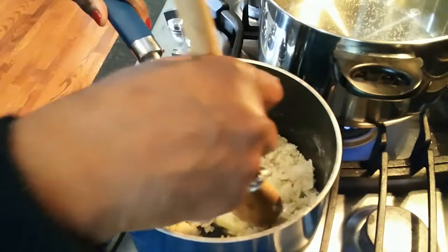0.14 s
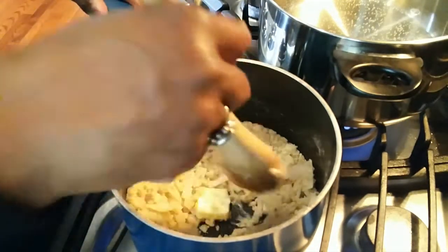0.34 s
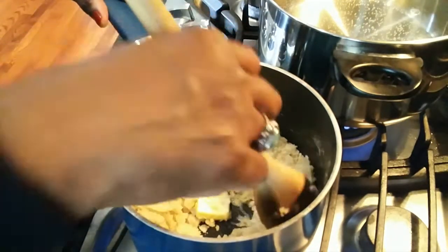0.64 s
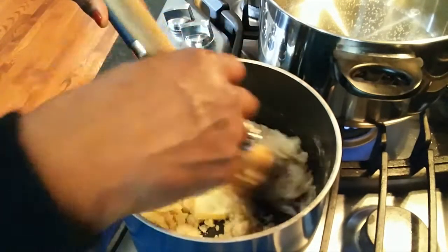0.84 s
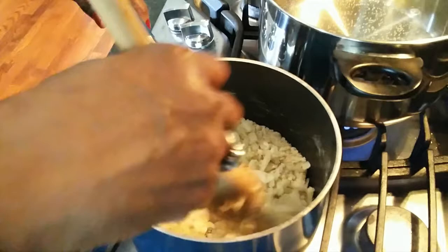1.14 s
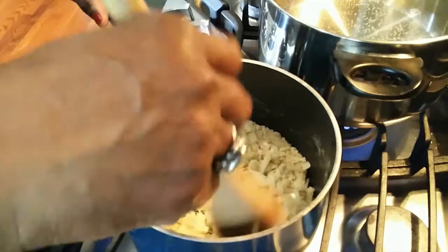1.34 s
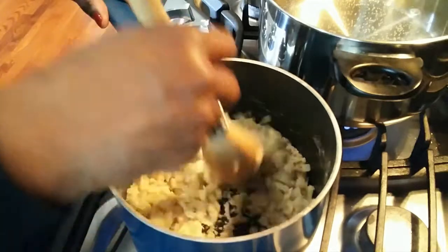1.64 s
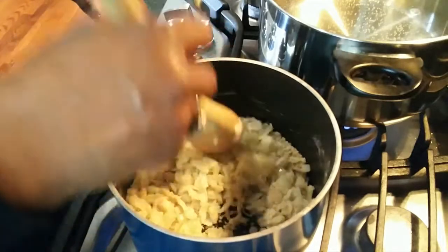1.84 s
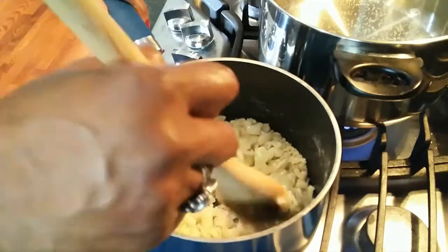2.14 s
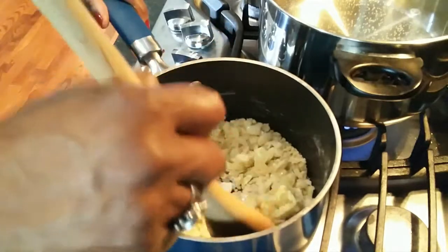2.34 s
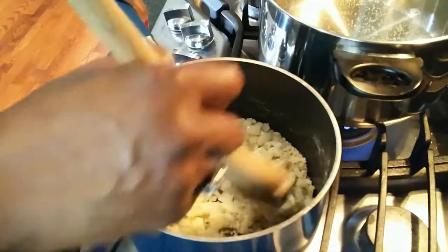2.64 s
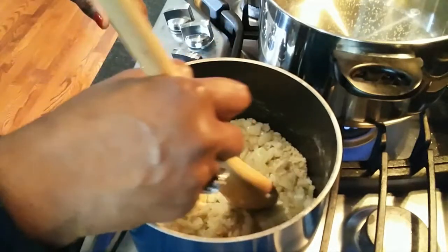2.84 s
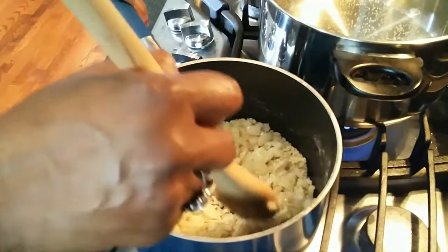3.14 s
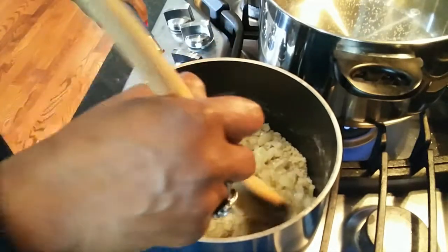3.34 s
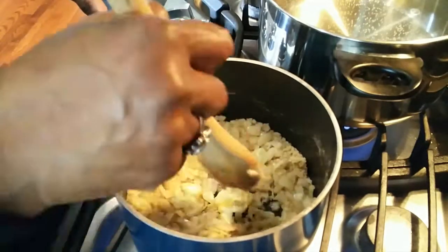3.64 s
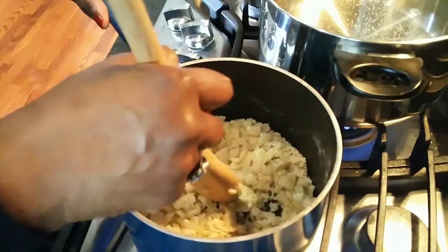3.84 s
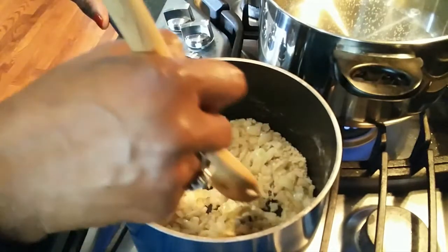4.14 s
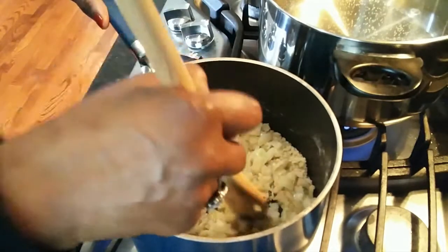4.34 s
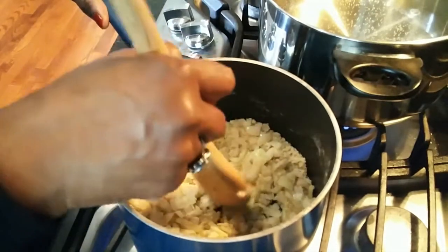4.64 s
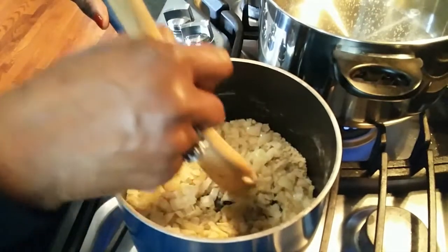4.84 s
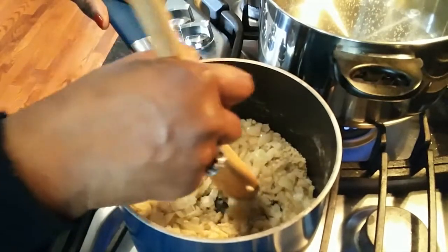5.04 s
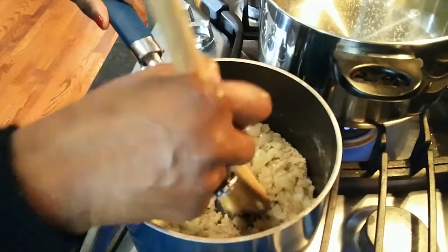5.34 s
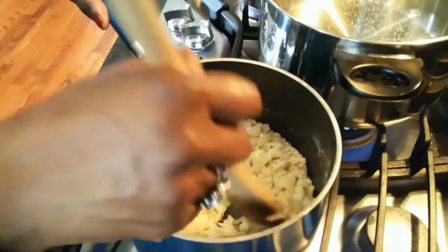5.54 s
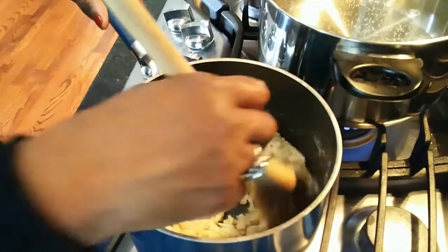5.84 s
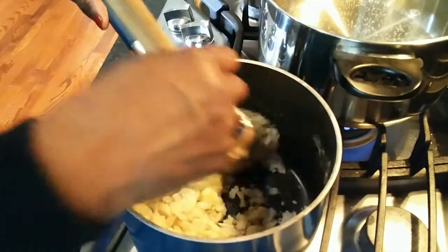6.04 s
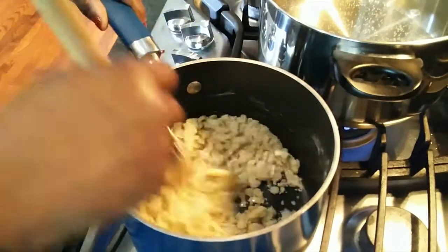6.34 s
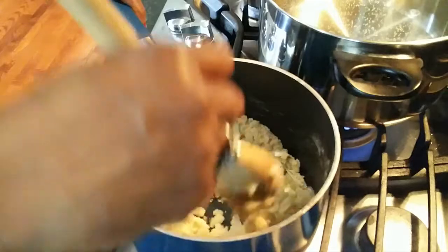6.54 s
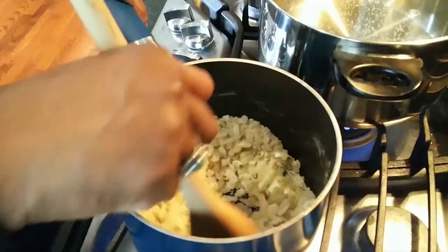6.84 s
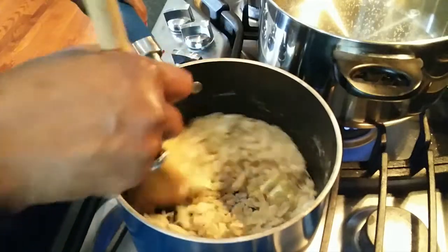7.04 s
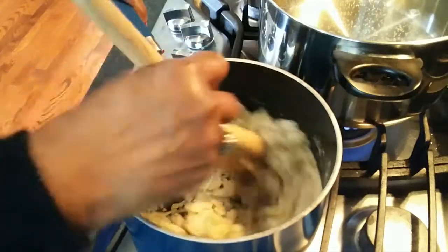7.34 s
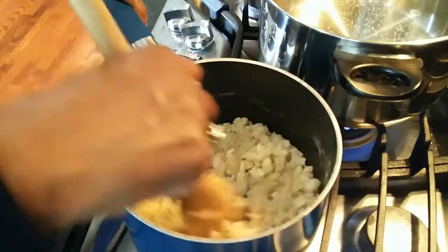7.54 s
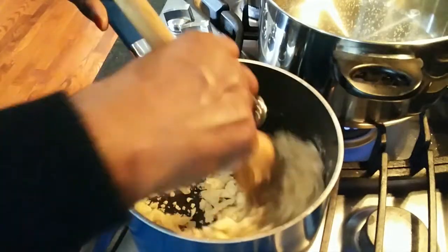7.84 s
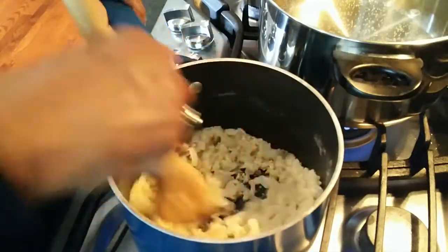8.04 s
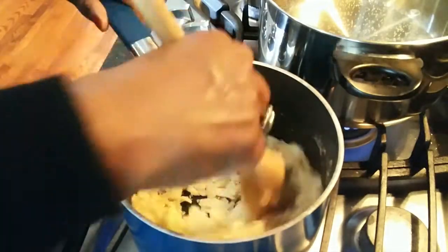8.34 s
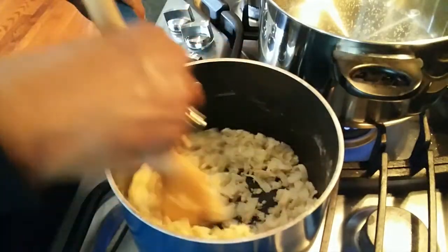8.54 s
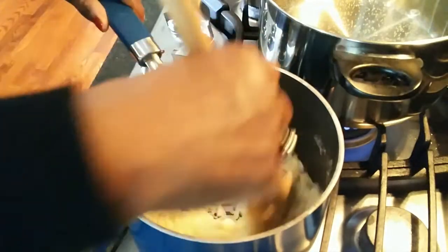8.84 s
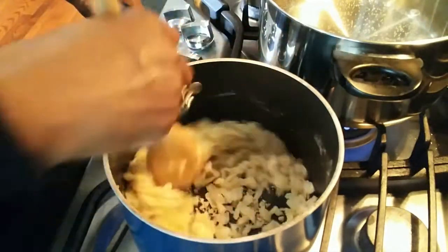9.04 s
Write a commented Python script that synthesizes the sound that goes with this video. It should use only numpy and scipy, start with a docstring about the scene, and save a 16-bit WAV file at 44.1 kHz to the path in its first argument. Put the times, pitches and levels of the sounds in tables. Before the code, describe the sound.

Close stereo pickup in a small kitchen. Fat fizzes finely over a soft, low gas flame roar while a wooden spoon lightly taps and scrapes a metal saucepan. The sizzle thins briefly, then separate hard, dull knocks ring the damped pan. The flame flutters, fat spits sharply, and frying grows louder under quick, dense scraping to the end.

```python
"""A saucepan of onion and flour frying on a gas stove in a small kitchen, heard close by two microphone ports.
Faint taps and wooden scrapes open over fizzing fat and burner roar; a thin tone sags at about 1 s.
The fizz thins from 2.2 to 3.3 s, then the spoon chops and knocks, hardest between 3.4 and 5.5 s.
Flame flutter swells at 6.5 s, fat spits thickly up to 7 s, then louder frying and dense scraping go on to the end.
Damped modes ring the pan, shaped noise makes fat and flame, and random echoes make the kitchen."""
import sys
import numpy as np
from scipy import signal
from scipy.fft import rfft, irfft
from scipy.io import wavfile
from scipy.ndimage import uniform_filter1d

SR = 44100
rng = np.random.default_rng(int(sys.argv[2]) if len(sys.argv) > 2 else 0)


def output_pcm(signal):
    """Save a mono or channel-first signal as 16-bit PCM at the path in sys.argv[1].

    Samples are clipped to [-1, 1] before scaling.
    """
    pcm = np.clip(np.atleast_2d(signal).T, -1, 1) * 32767
    wavfile.write(sys.argv[1], SR, np.round(pcm).astype(np.int16))


N = 404838


def gain_of(db):
    """dB to amplitude."""
    return 10 ** (np.asarray(db) / 20)


def evened(x):
    """Scales to rms 1."""
    return x / np.sqrt(np.mean(x ** 2) + 1e-20)


def read(hz, f, value):
    """Reads a spectrum on a log-frequency axis."""
    return np.interp(np.log(hz + 1), np.log(np.asarray(f) + 1), value)


def follow(rows):
    """Curve columns at every sample; the first, a level, is silent outside the table."""
    s, level_db, *rest = np.transpose(rows)
    t = np.arange(N) / SR
    level = np.interp(t, s, level_db, -200, -200)
    return [level] + [np.interp(t, s, column) for column in rest]


def grains(per_s, spread_db, length_ms):
    """Envelope of random short bursts, a few of them large."""
    size = gain_of(spread_db * np.minimum(rng.exponential(1, N), 5))
    starts = rng.random(N) < per_s / SR
    decay = np.exp(-1000 / (SR * length_ms))
    return evened(signal.lfilter([1], [1, -decay], size * starts))


def fuzzy(hz, width_hz, steady):
    """Noise narrowed to a wavering line that follows hz; steady (0-1) evens out its level."""
    r = np.exp(-np.pi * width_hz / SR)
    noise = rng.standard_normal(N) + 1j * rng.standard_normal(N)
    slow = signal.lfilter([1], [1, -2 * r, r * r], noise)
    slow = slow / (abs(slow) + 1e-9) ** np.clip(steady, 0, 1)
    phase = 2 * np.pi * np.cumsum(hz * np.ones(N)) / SR
    return evened((slow * np.exp(1j * phase)).real)


# burner and room spectrum before overall scaling: (frequency [Hz], level [dB per Hz])
ROAR = [(20, -45), (36, 0), (52, -2.5), (80, 2.5), (120, -7), (140, -3), (306, -21.5), (342, -8),
        (398, -19), (552, -12.5), (657, -6.5), (993, -22), (4000, -36), (5200, -93), (8800, -120)]
# likeness of the two microphone ports: (frequency [Hz], left-right correlation [-1 to 1])
LIKENESS = [(60, 0.91), (180, 0.82), (550, 0.24), (1650, -0.37), (4970, 0.79), (15000, -0.13)]
# flame flutter lines: (frequency [Hz], width [Hz], level [dB against the flame])
FLUTTER = [(63.5, 6.4, 1.5), (116.5, 8.2, -10.5)]
# flame strength, which drives the flutter: (time [s], level [dB])
FLAME = [(0, -57.5), (3.2, -60), (6.2, -57.5), (6.5, -47.5), (7.0, -55.5), (9.18, -56.5)]
ROAR_DB, PATCH_DB = -51.5, 3.35  # roar level over both ports; depth of its drifting patches


def burner():
    """Low roar of flame and room in drifting patches, with the flame's flutter on top."""
    frames, hz = N // 512 + 5, np.fft.rfftfreq(2048, 1 / SR)
    a, b, c, d, patches = rng.standard_normal((frames, 1025, 5)).T
    patches = uniform_filter1d(patches, size=8, axis=0)
    patches = evened(uniform_filter1d(patches, size=10, axis=1))
    same = np.clip(read(hz, *np.transpose(LIKENESS)), -1, 1)[:, None]
    left, other = a + 1j * b, c + 1j * d
    z = np.array([left, same * left + np.sqrt(1 - same ** 2) * other])
    drift_db = PATCH_DB * patches * np.clip(hz / 250, 0, 1)[:, None]  # the lowest bass drifts less
    z *= gain_of(read(hz, *np.transpose(ROAR))[:, None] + drift_db)
    roar = gain_of(ROAR_DB) * evened(signal.istft(z, nperseg=2048, noverlap=1536)[1][:, :N])
    lines = sum(gain_of(db) * fuzzy(f, width, 0.15) for f, width, db in FLUTTER)
    flutter = gain_of(follow(FLAME)[0]) * lines
    return (roar + flutter) * gain_of([[.7], [-.7]])  # the left port hears slightly more


# a faint thin tone: (time [s], frequency [Hz], level [dB])
TONE = [(.86, 736, -66), (.9, 728, -50.5), (1.05, 724, -56), (1.115, 697, -53), (1.135, 708, -79)]


def tone():
    """A faint thin line of narrowed noise that wavers as it sags."""
    s, hz, db = np.transpose(TONE)
    level_db = follow(np.transpose([s, db]))[0]
    return gain_of(level_db) * fuzzy(np.interp(np.arange(N) / SR, s, hz), 6.0, .85)


# how long the small kitchen answers: (frequency [Hz], time to fall 60 dB [s])
KITCHEN = [(200, 0.5), (530, 0.35), (1400, 0.27), (5000, 0.28)]


def kitchen(x):
    """Sparse random echoes, each band dying at its own speed; three sets take turns so no one colour dominates."""
    taps = np.zeros((3, 2, SR // 2))
    slots = np.arange(260, SR // 2 - 20, 20)  # the first echo comes after about 6 ms
    at = slots + rng.integers(0, 20, (3, 2, (SR // 2 - 261) // 20))
    np.put_along_axis(taps, at, rng.choice([-1., 1.], at.shape), 2)
    taps[:, 1] = .6 * taps[:, 0] + .8 * taps[:, 1]  # the ports share part of the echoes
    hz, t, z = signal.stft(taps, SR, nperseg=256)
    t60 = read(hz, *np.transpose(KITCHEN))[:, None]
    tail = signal.istft(z * gain_of(-60 * t / t60), SR, nperseg=256)[1]
    tail = tail * np.sqrt(3) / np.linalg.norm(tail[:, 0])
    offset = np.arange(3)[:, None, None] / 3
    turn = np.sqrt(2 / 3) * np.cos(np.pi * (np.arange(N) / SR * 1.3 + offset))
    return signal.fftconvolve(x * turn, tail, axes=2).sum(0)[:, :N]


def stroke(contact_s, build_s, hold_s, entry_db, db_per_s):
    """Level of one stroke in dB against full contact: build-up, hold, lift."""
    t = np.arange(N) / SR - contact_s
    build_db = np.minimum(entry_db * -t / max(build_s, .005), 0)
    return build_db - db_per_s * np.maximum(t - hold_s, 0)


# steady frying: (time [s], level of the fine fizz [dB], coarser fizz [dB against the fine])
FRY = [(0, -51.5, -7), (1.55, -50, -7), (1.81, -45, -14.5), (2.12, -50, -7), (2.22, -59.5, -2.5),
       (3.3, -58.5, -4.5), (3.4, -52, -5.5), (4.0, -52, -7), (4.19, -57.5, -1), (4.26, -50.5, -9.5),
       (5.0, -50.5, -8.5), (5.3, -45, -13), (5.7, -52, -7), (6.15, -49, -9.5), (6.93, -41.5, -5),
       (7.33, -36.5, -5.5), (7.56, -48.5, -2), (7.75, -42.5, -4), (8.15, -47.5, -3), (8.41, -39, -5.5),
       (8.65, -45.5, -3), (8.95, -38.5, -4.5), (9.18, -44, -4)]
# fat spitting: (time [s], relative peak level [dB], decay [ms])
SPITS = [(0.021, -29.5, 4.2), (0.0457, -30, 0.95), (0.135, -32, 1.3), (1.6095, -32, 1.3),
         (2.556, -31.5, 11), (3.275, -39, 1.5), (3.605, -34, 0.8), (4.0393, -28, 0.86), (4.2347, -27, 1.3),
         (4.268, -28, 1.7), (4.5054, -30, 1.5), (4.518, -24.5, 1.0), (4.6, -34, 2.2), (5.074, -29, 4.4),
         (5.259, -32, 0.8), (5.274, -32, 0.77), (5.366, -34, 1.5), (5.465, -34, 1.8), (5.766, -47, 1.1),
         (6.302, -30, 1.4), (6.617, -33.5, 9.1), (6.628, -27, 0.73), (6.66, -35, 8.6), (6.819, -24, 0.73),
         (6.841, -22, 0.7), (6.9834, -22, 2), (7.016, -28, 0.8), (7.025, -23, 0.8), (8.9165, -30, 1.2)]
# how each microphone port hears the fizz: (frequency [Hz], left relative level [dB], right relative level [dB])
PORTS = [(1300, -39, -30), (2370, -24, -20.5), (2700, -25.5, -18.5), (3720, -15, -19), (4053, -13, -4),
         (4150, -51, -46.5), (4295, -10, -14), (5630, -13, -8.5), (5830, -11, -12.5), (6720, -8, -2),
         (8020, -8.5, -2), (9100, -13.5, -23.5), (9250, -5, -22), (10120, 6.5, -4), (10850, 13, -12),
         (11860, 4, -11), (13550, 2, -6), (17100, -1, -74)]
SPLIT_HZ = 8900  # fine fizz above, coarser fizz below
# a knock shakes the fat into a short fizz, this far under the knock
JOLT_DB, JOLT_DB_PER_S, JOLT_RISE_S = -37.5, 118, 0.016
# bared hot metal fizzes up with each stroke: level one build-up before contact, fall, coarser part
FLARE_ENTRY_DB, FLARE_DB_PER_S, FLARE_COARSE_DB = -40, 190, -2.5


def frying():
    """Tiny steam bubbles burst in the fat: bursts of noise, unlike at the two ports, over a dense hiss."""
    fine_db, coarse_db = follow(FRY)
    flare = sum(gain_of(db + stroke(*shape, FLARE_ENTRY_DB, FLARE_DB_PER_S))
                for *shape, _, _, _, db in STROKES)
    t = np.arange(N) / SR
    flare += sum(gain_of(db + JOLT_DB - JOLT_DB_PER_S * abs(t - s)) * np.clip((t - s) / JOLT_RISE_S, 0, 1)
                 for s, db, *_ in KNOCKS)
    fine = np.hypot(gain_of(fine_db), flare)
    coarse = np.hypot(gain_of(fine_db + coarse_db), gain_of(FLARE_COARSE_DB) * flare)

    bursts = grains(110, 3.8, 1.5)  # sparse larger bubbles, shared by both bands
    crackle = 0.93 + 0.48 * grains(790, 4.9, 5.2) + 0.18 * bursts
    rasp = 1.65 + 0.5 * grains(300, 6.2, 7.8) + 0.13 * bursts  # larger bubbles crackle on their own
    spits = np.zeros(N)
    for s, peak_db, ms in SPITS:
        start = round(s * SR)
        t_ms = np.arange(min(1500, N - start)) * 1000 / SR
        shape = np.exp(-t_ms / max(ms, .3)) * np.minimum(t_ms / 0.27, 1)
        spits[start:][:len(t_ms)] += gain_of(peak_db - 6.5) * shape

    hz = np.fft.rfftfreq(N, 1 / SR)
    f, *port_db = np.transpose(PORTS)
    bass_cut = np.clip(hz / f[0], 0, 1) ** 4
    colour = gain_of([read(hz, f, p) for p in port_db]) * bass_cut
    noise, out = rng.standard_normal((2, N)), 0
    fine_part = (hz > SPLIT_HZ, fine * evened(crackle))
    coarse_part = (hz <= SPLIT_HZ, coarse * evened(rasp))
    for band, level in (fine_part, coarse_part):
        norm = 2 / np.sqrt(np.mean((colour * band).sum(0) ** 2))
        out = out + irfft(rfft(noise * level) * colour * band * norm, N)
    spit_tilt = gain_of(5.0) * (hz / 11000 + .01) ** -0.3  # spits are duller than the fizz
    return out + irfft(rfft(noise * spits) * colour * spit_tilt, N)


THUD_HZ, THUD_DB, THUD_S = (89, 213.5), -20, 0.047  # band, dB against the deep family, decay


def thuds():
    """Deep knocks push the pan onto its support: a short low rumble."""
    t = np.arange(N) / SR
    push = sum(gain_of(db + deep_db + THUD_DB) * np.exp(-abs(t - s) / THUD_S) * (t > s)
               for s, db, deep_db, *_ in KNOCKS)
    band = signal.butter(2, THUD_HZ, "band", fs=SR, output="sos")
    rumble = evened(signal.sosfilt(band, rng.standard_normal(N)))
    return signal.sosfilt(band, push * rumble)


# pan modes: (frequency [Hz], left relative level [dB], right relative level [dB],
# time to fall 60 dB before the food's damping [s])
PAN = [(280.8, -12, -15.5, 0.17), (379.3, -5, -6, 0.17), (479.5, -8, -10, 0.037), (558, -9, -3.5, 0.16),
       (605.3, 9.5, 2, 0.044), (669.5, 0.5, -17.5, 0.063), (757.5, 0.5, -10.5, 0.1), (820, -2.5, -2, .08),
       (887.8, 8.5, 8.5, 0.041), (957, -3, -10, 0.096), (1043, -1.5, -5.5, 0.03),
       (1148, -13.5, -16.5, 0.029), (1190, 10.5, -14.5, 0.0038), (1290, -23.5, -14, 0.031),
       (1741, 9, 8, 0.04), (1833, -10, 5, 0.04), (1920, -10, -11.5, 0.03), (2723, 35.5, 35.5, 0.03),
       (2960, -12, 30.5, .03), (3954, 39, 27, 0.015), (4580, 35, 28, .015)]
# borders between the lowest, deep, body, wall, rim, bright and top families of modes: (frequency [Hz])
FAMILY_HZ = (340, 430, 700, 1020, 1500, 2400)


def ring(family_db, cycles, damping, chance):
    """Stereo ring of the modes; each builds up over some cycles, as the spoon lands through soft food."""
    hz, left_db, right_db, t60 = np.transpose(PAN)[..., None]
    t60 = np.minimum(t60, 55 / hz) / damping  # food limits every mode to 55 cycles, contact damps it further
    t = np.arange(5000) / SR
    family = np.searchsorted(FAMILY_HZ, hz)
    db = np.asarray(family_db)[family] + 2.4 * chance[0]  # each spot favours other modes
    turns = hz * (1 + 0.015 * chance[1]) * t
    build = (1 - np.exp(-turns / max(cycles, .05))) ** 2
    modes = gain_of(db - 60 * t / t60) * build * np.sin(2 * np.pi * turns)
    return np.array([(gain_of(port_db) * modes).sum(0) for port_db in (left_db, right_db)])


# spoon strokes over the bottom: (time of full contact [s], build-up [s], hold [s], relative body level [dB],
# wall family [dB, relative to body], bright family [dB, relative to body], flare of the fizz [dB])
STROKES = [(0.203, 0.038, 0.056, -48.5, -6.5, -6, -53), (0.75, 0.041, 0.011, -57, -9, -7, -53),
           (0.816, 0.091, 0.011, -35.5, -3.5, -6, -44.5), (1.159, 0.031, 0.036, -42.5, -9, -8.5, -50),
           (1.433, 0.028, 0.11, -52, -14.5, -10, -58), (1.637, 0.094, 0.054, -53, 0, 0, -49),
           (2.06, 0.072, 0.053, -54.5, -0.5, 2.5, -51), (2.21, 0.26, 0.39, -53, -17, -12, -84),
           (2.89, 0.1, 0.0058, -46.5, -6.5, -17, -51.5), (2.979, 0.094, 0.0056, -49, -7, -5, -53),
           (4.63, 0.023, 0.0076, -38, -4, -26, -75), (4.95, 0.047, 0.051, -55.5, -6, -28, -75),
           (5.944, 0.13, 0.11, -44.5, -14, -3, -44.5), (6.238, 0.031, 0.044, -48, -18, -18, -75.5),
           (6.419, 0.086, 0.087, -49.5, -4.5, 0.5, -44.5), (6.792, 0.04, 0.16, -52.5, -10, -11.5, -63),
           (7.055, 0.056, 0.094, -34.5, -6.5, -13.5, -43), (7.164, 0.02, 0.0092, -30.5, -12, -10, -43),
           (7.22, 0.029, 0.057, -45, -7, -0.5, -46), (7.369, 0.034, 0.086, -39, 1.5, -7, -43.5),
           (7.445, 0.015, 0.016, -42.5, -1, -3, -51), (7.6, 0.055, 0.032, -42, 4.5, 3, -67),
           (7.71, 0.062, 0.012, -41, -22, -4.5, -77), (7.849, 0.13, 0.046, -38.5, -2, -5, -39.5),
           (8.106, 0.048, 0.019, -31, -3.5, -7.5, -44.5), (8.2, 0.019, 0.01, -41.5, -1.5, -7, -73),
           (8.298, 0.03, 0.012, -29, -4.5, -11, -65), (8.575, 0.1, 0.048, -38, 0, -3.5, -54),
           (8.795, 0.075, 0.032, -34.5, 0, -3.5, -70), (8.834, 0.015, 0.0061, -41, 2, -28, -42),
           (9.033, 0.063, 0.0065, -31, -5, -10, -49), (9.1, 0.019, 0.02, -28.5, -5, -11.5, -71)]
# level one build-up before full contact, and the speed at which a lifted stroke dies
ENTRY_DB, LIFT_DB_PER_S = -14, 340


def scrapes():
    """Dense uneven slips of wood on metal drive the modes; every stroke crosses another part of the bottom."""
    slips = evened(1.2 + grains(400, 4.2, 3.0)) * rng.standard_normal(N)
    # slow random swells of the slips are evened out
    slips = slips / np.sqrt(uniform_filter1d(slips ** 2, size=1100))
    chance = rng.standard_normal((len(STROKES), 2, len(PAN), 1))
    out = np.zeros((2, N + 5000))
    for (*shape, body_db, wall_db, bright_db, _), spot in zip(STROKES, chance):
        level_db = stroke(*shape, ENTRY_DB, LIFT_DB_PER_S)
        a, b = np.flatnonzero(level_db > -50)[[0, -1]]  # the audible stretch
        family_db = body_db + np.array([-12.0, -12.5, 0, wall_db + 0.5, wall_db - 1.5,
                                        bright_db - 13.5, bright_db - 38.5])
        drive = (gain_of(level_db) * slips)[None, a:b]
        out[:, a:b + 4999] += signal.fftconvolve(drive, ring(family_db, 1.62, 1.047, spot), axes=1)
    return gain_of(-23.5) * out[:, :N]


# knocks of the spoon, and from 7 s mostly sharp contacts within the scraping: (time [s], relative level [dB],
# then the deep, wall, rim and bright families [dB, relative to body], rattle [0-1])
KNOCKS = [(0.021, -39.5, -29, -7, -13, -22, 0.13), (0.214, -38.5, 3.5, -16.5, -4, -43, 0.81),
          (0.554, -35, 9, -26, -32, -44, 0.62), (0.585, -22, 3, -23.5, -42.5, -35, 0.49),
          (0.746, -20, -5.5, -9, -18, -33, 0.12), (0.753, -20.5, -10, -13, -15, -41, 0.41),
          (1.429, -41, -1, -42, -43, -28, 0.16), (2.516, -23.5, -0.5, -21.5, -20, -25.5, 0.54),
          (2.53, -27, -4, -25, -20, -31, 0.3), (2.555, -28, -6, -0.5, 1, -7, 0.1),
          (2.572, -32, -18, -5, -12, -18, 0.23), (2.803, -21.5, -3.5, -25, -24, -29, 0.6),
          (2.82, -35, -1, -17, -18, -27, 0.12), (2.985, -42, -20, -3, -23, -20, 0.46),
          (3.31, -45, 4, -22, -28, -40, 0.48), (3.395, -14, -21, -13.5, -41, -37, 0.039),
          (3.503, -30, -7, -11, -13, -26.5, 0.52), (3.857, -33, 2.5, -18, -25, -30, 0.89),
          (3.881, -29.5, -4.5, -5, -12, -21.5, 0.044), (4.239, -25.5, -2, -35, -35, -29, 0.51),
          (4.268, -35, -14, -5, 0, -18, 0.36), (4.28, -11.5, -37, -13, -11.5, -38, 0.041),
          (4.649, -11.5, -14, -15, -12.5, -31.5, 0.03), (5.082, -8, -33, -14, -4.5, -25, 0.033),
          (5.459, -24, -18, -9.5, -9, -20, 0.89), (5.476, -16, -3, -7, -9, -20, 0.082),
          (5.711, -21, 0, -28, -38, -52, 0.82), (5.845, -22.5, 0.5, -21.5, -22, -31, 0.6),
          (5.929, -16, -8, -6.5, -1, -23, 0.26), (5.955, -20, -9.5, -9, -8, -27, 0.76),
          (6.733, -27.5, -3.5, -26, -29, -40, 0.5), (7.052, -40, -17, -17, -24, -30, 0.4),
          (7.162, -39, -14, -1.5, -25, -30, 0.46), (7.21, -35, -2, -21, -27, -23, 0.72),
          (7.368, -37, -6, 0, -12, -31, 0.34), (7.443, -36, -7, -7, -18, -30, 0.3),
          (7.562, -51, -15, 4, -3, -25, 0.3), (7.596, -42, -15, 4, -10, -27, 0.3),
          (7.637, -42.5, -15, -2, -20, -22, 0.12), (7.732, -43, -12, -10, -15, -29, 0.3),
          (8.048, -28.5, -3, -11, -21, -49, 0.063), (8.109, -28, -12, -9, -21, -18, 0.23),
          (8.289, -32, -20, 1.5, -16, -28, 0.6), (8.571, -33, -9, -9, -12, -27, 0.15),
          (8.795, -33.5, -10, -4, -12, -20, 0.32), (9.021, -36, -17, -8, -4, -25, 0.34),
          (9.087, -35, -12, -6, -8, -25, 0.33)]
# a soft, rattling contact moves weight from the deep to the lowest mode
SOFT_LOWEST_DB, SOFT_DEEP_DB = 11, -2.5
SOFT_CYCLES = 1.6  # and makes every mode build up over this many more cycles


def knocks():
    """Each knock or sharp scrape contact rings the pan with a dull crack of wood; rattle spreads it into bumps."""
    out, t = np.zeros((2, N + 7000)), np.arange(5000) / SR
    chance = rng.standard_normal((len(KNOCKS), 2, len(PAN), 1))
    wood_band = signal.butter(2, [1300, 2700], "band", fs=SR, output="sos")
    crack = signal.sosfilt(wood_band, rng.standard_normal((len(KNOCKS), 1, 5000)))
    crack = crack * np.exp(-t / 0.011) * np.minimum(t / 0.0034, 1)
    short = t[:2000]
    bumps = rng.standard_normal((len(KNOCKS), 2000)) * np.exp(-short / .01) * np.minimum(short / .005, 1) * .09
    for row, spot, wood, bump in zip(KNOCKS, chance, crack, bumps):
        s, knock_db, deep_db, wall_db, rim_db, bright_db, rattle = row
        lowest_db = deep_db + 3.0 + SOFT_LOWEST_DB * rattle
        family_db = knock_db + np.array([lowest_db, deep_db + 1.5 + SOFT_DEEP_DB * rattle, 6., wall_db + 11.5,
                                         rim_db + 16.0, bright_db + 1.5, bright_db - 30.0])
        rattle = np.clip(rattle, 0, 1)
        force = rattle * bump + (1 - rattle) * (short == 0)
        # the spoon stays pressed on the metal and shortens the ring
        knock = ring(family_db, 1.005 + SOFT_CYCLES * rattle, 1.64, spot)
        knock = knock + gain_of(family_db[5] + 9.0) * wood
        spread = signal.fftconvolve(knock, force[None], axes=1)
        same_energy = np.linalg.norm(knock) / np.linalg.norm(spread)
        out[:, round(s * SR):][:, :6999] += spread * same_energy
    return out[:, :N]


def saucepan():
    """Knocks and scrapes; a small pan radiates little bass, and the right port is a little farther."""
    high = signal.butter(2, 250, "high", fs=SR, output="sos")
    dry = signal.sosfilt(high, knocks() + scrapes())
    dry[1] = np.concatenate([np.zeros(6), dry[1, :-6]])  # 6 samples later at the right port
    return dry + gain_of(-7.0) * kitchen(dry)


def scene():
    """Burner, tone, frying, pan support and pan together."""
    return burner() + tone() + frying() + thuds() + saucepan()


EDGE_HZ = 15850  # upper band edge


def record(dry):
    """Limits the band with a steep low-pass."""
    lowpass = signal.firwin(1023, EDGE_HZ, window=("kaiser", 9), fs=SR)
    return signal.oaconvolve(dry, lowpass[None], "same")


dry = scene()
out = record(dry)
output_pcm(out)
```